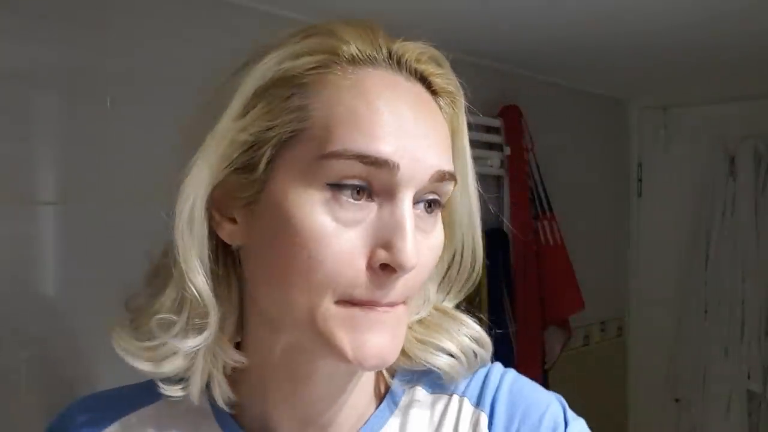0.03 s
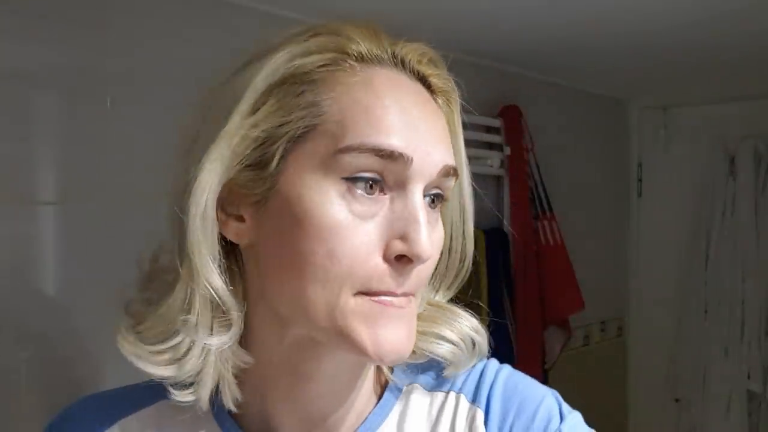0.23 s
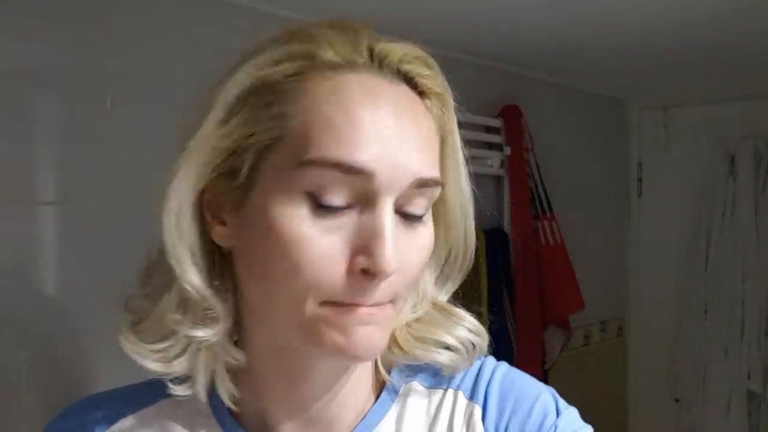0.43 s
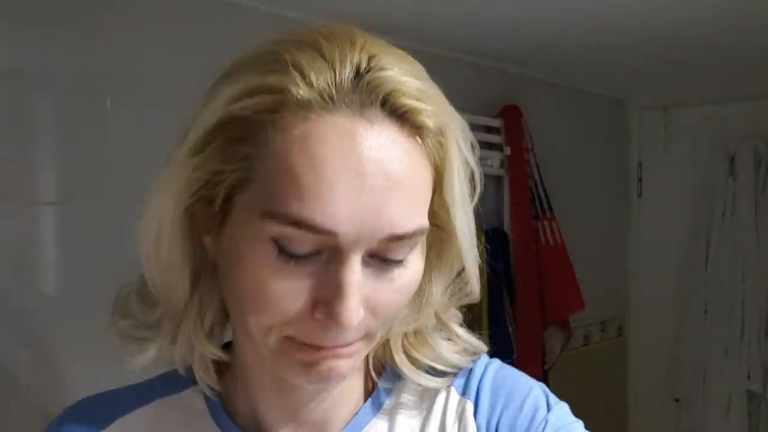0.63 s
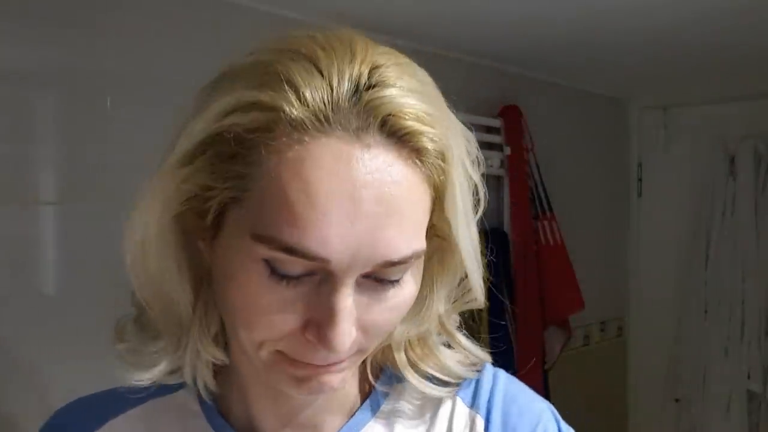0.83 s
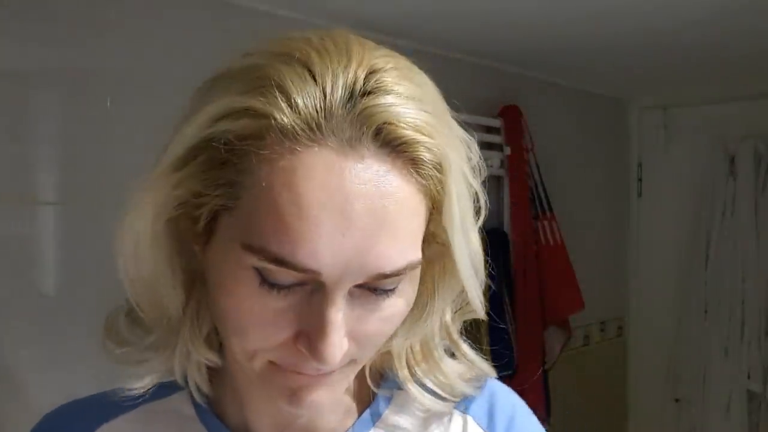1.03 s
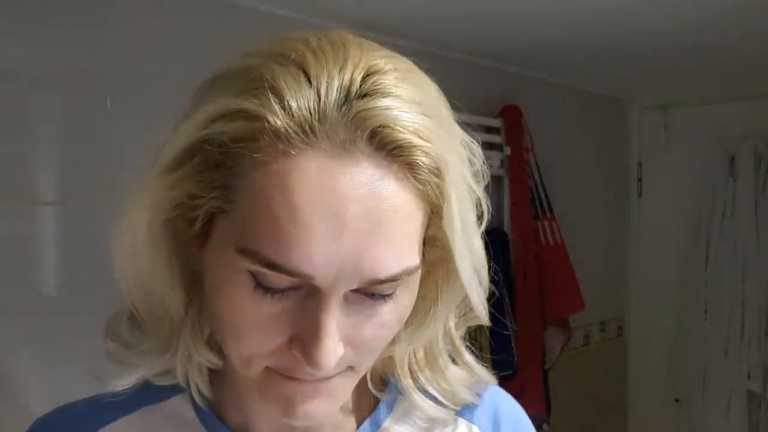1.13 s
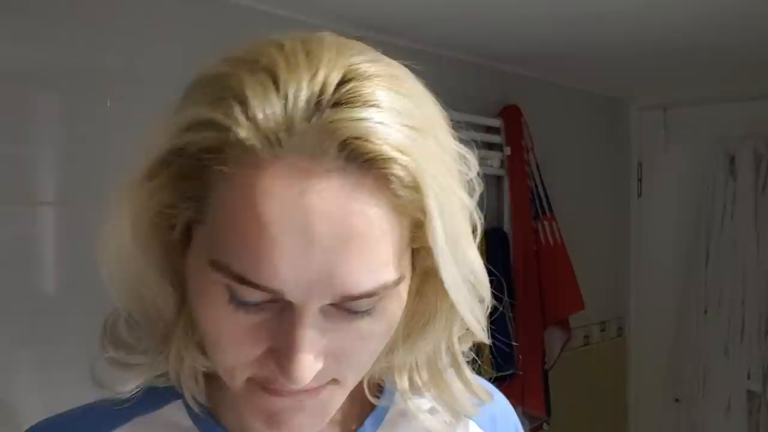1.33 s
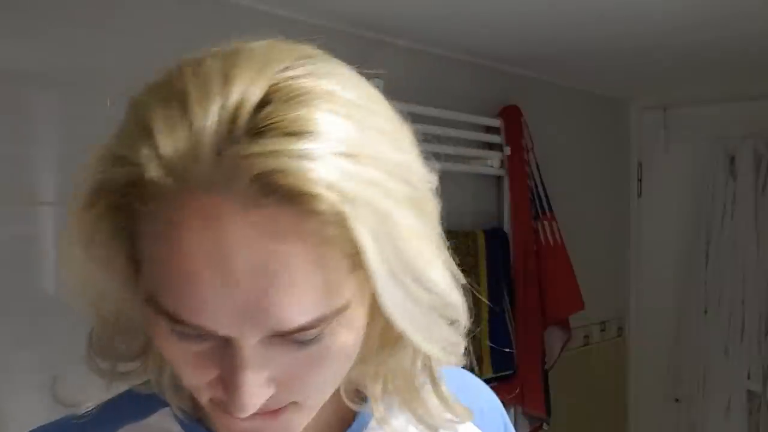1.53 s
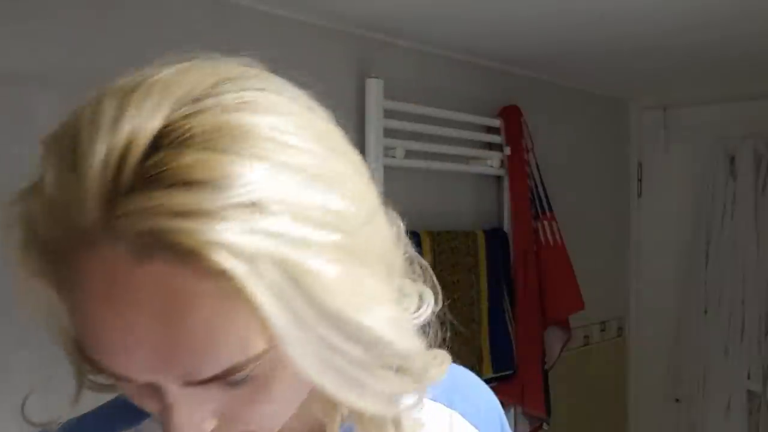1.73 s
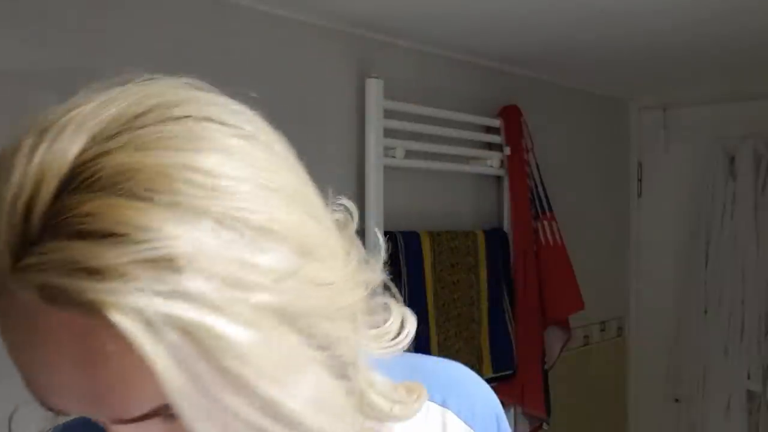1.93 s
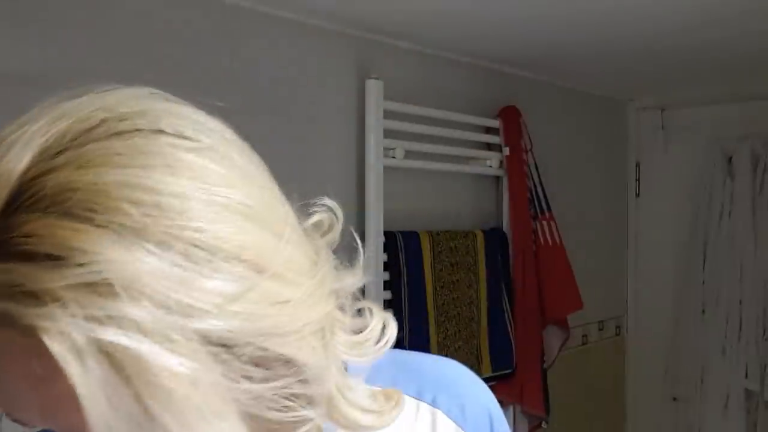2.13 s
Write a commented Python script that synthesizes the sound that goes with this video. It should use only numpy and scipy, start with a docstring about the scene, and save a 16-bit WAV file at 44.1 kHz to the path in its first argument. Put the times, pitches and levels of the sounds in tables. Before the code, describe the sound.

A small plastic cap rattles rapidly in a hollow basin, knocks again, then drops and bounces on tiles with sharp, spaced clicks and a soft thud between, in a small echoing bathroom, close stereo phone microphones.

```python
"""Plastic cap on a tiled floor

A small plastic cap rattles in a basin, falls and bounces over a tiled bathroom floor.
Every contact is a click far shorter than the answer of the hard walls: struck modes filtered by a room.
The hollow basin knocks, a soft thud falls in between; low rumble, a faint narrow band of noise near
2.8 kHz, hiss and hum lie beneath.
Two unlike phone microphones listen: the right one faces the floor, the left one is shaded."""
import sys
import numpy as np
from scipy import signal
from scipy.fft import rfft, irfft, next_fast_len
from scipy.io import wavfile
from scipy.ndimage import uniform_filter1d

SR = 44100
rng = np.random.default_rng(int(sys.argv[2]) if len(sys.argv) > 2 else 0)


def voltage_ratio(level):
    """Linear amplitude factor for a level in decibels (scalar or array-like)."""
    return 10 ** (np.asarray(level, float) / 20)


def transcribe(signal):
    """Save signal, clipped to [-1, 1], as a 16-bit WAV file at the path in sys.argv[1]."""
    frames = np.atleast_2d(signal).T
    limited = np.clip(frames, -1, 1)
    pcm = np.round(limited * 32767).astype(np.int16)
    wavfile.write(sys.argv[1], SR, pcm)


N = 95564
TAIL = 2 ** 15  # transform length in samples; each event lasts half of it

# Sharp hits of the cap, the first ones in the basin, the later ones on the floor.
# Each row: start in seconds, then rim ring, wall ring, lid ring, broad slap and bright snap in dB,
# and straight path in dB over the room.
HITS = [(0.4812, -42, -41, -62, -42.5, -45.5, 13), (0.5697, -28.5, -25, -41.5, -33.5, -39.5, 21.5),
        (0.613, -49.5, -50.5, -60, -43, -49.5, 12), (0.758, -67, -66.5, -73.5, -59, -67, -1),
        (.8600, -32.5, -23, -73.5, -35.5, -20, 17), (.893, -42.5, -28, -67.5, -45.5, -30, 4),
        (1.4288, -22, -21.5, -40, -27, -17.5, 11.5), (1.7202, -39.5, -30, -38.5, -46, -29, -2),
        (2.1017, -26.5, -22.5, -88, -36.5, -22, 4)]
# Short dense bowl-like echo after each hit. One value for each hit: level in dB over the room.
BOWL_ECHO_DB = [-11, 5.5, -11, -10, -7, -20, -12.5, -1, -15.5]
# Modes of the cap's rim, wall and lid, then of the slapped surface and the bright snap.
# Each row: centre in Hz, width in Hz, relative level in dB.
RIM_MODES = [(9300, 900, -8), (10500, 900, 0), (11800, 1200, -8)]
WALL_MODES = [(4050, 400, -6), (4750, 500, 0), (5400, 600, -7)]
LID_MODES = [(1100, 90, 0), (1720, 100, 0), (2270, 150, -6)]
SLAP_MODES = [(430, 400, -11.5), (857, 170, -5), (1420, 1100, 2), (2480, 2600, 4.5), (14300, 2500, -6.5)]
SNAP_MODES = [(7500, 6500, -0.5), (10185, 8200, -1), (13120, 3000, -3)]


def hits(hz):
    """Modal excitation: where the cap lands sets how strongly its rim, wall and lid ring."""
    out = np.zeros((2, N + TAIL))
    bodies = (RIM_MODES, WALL_MODES, LID_MODES, SLAP_MODES, SNAP_MODES)
    shade = [[voltage_ratio(LEFT_SHADE_DB)], [1]]
    for (start, *levels, direct_db), echo_db in zip(HITS, BOWL_ECHO_DB):
        click = sum(voltage_ratio(db) * ring(modes, hz) for db, modes in zip(levels, bodies))
        add(out, start, click * (room(direct_db, hz) + flurry(echo_db) * shade))
    return out


# Contacts of the cap in the basin. Each row: start in seconds, click on the glaze in dB, clack in dB,
# broad slap in dB, bowl echo in dB over the room.
RATTLE = [(0.016, -63, -63, -67.5, 5.5), (.034, -58, -43.5, -49, 8.5), (0.0395, -52, -40, -50, 15),
          (0.0613, -43.5, -53, -42, -1.5), (0.0759, -49.5, -37, -44, 12), (0.081, -45.5, -49.5, -44.5, 22),
          (0.099, -58, -52, -47, 4.5), (0.1288, -53.5, -36.5, -41.5, 21.5), (0.1521, -33.5, -27, -38, 14.5),
          (.160, -43, -34.5, -42, 23.5), (0.19, -51.5, -39, -46, 14.5), (0.2161, -42, -36.5, -45.5, 20.5),
          (0.541, -59.5, -59, -67.5, 6.5), (0.552, -59, -58, -45.5, 10)]
# Modes of the glaze, and of the cap against the bowl.
# Each row: centre in Hz, width in Hz, relative level in dB.
GLAZE_MODES = [(3200, 3100, 0.5), (6000, 1300, 1.5), (8035, 600, 2.5), (11000, 3300, -3.5)]
CLACK_MODES = [(3100, 830, -2.5), (3730, 1000, -0.5), (4300, 700, 3.5), (5670, 800, -9)]


def rattle(hz):
    """Repeated impact: each contact excites glaze, cap and slap, and the bowl echoes it."""
    out = np.zeros((2, N + TAIL))
    for start, glaze_db, clack_db, slap_db, echo_db in RATTLE:
        click = voltage_ratio(glaze_db) * ring(GLAZE_MODES, hz)
        click = click + voltage_ratio(clack_db) * ring(CLACK_MODES, hz)
        click = click + voltage_ratio(slap_db) * ring(SLAP_MODES, hz)
        add(out, start, click * (room(HIDDEN_DB, hz) + flurry(echo_db)))
    return out


def flurry(echo_db):
    """Dense early reflections: a first click, then noise decaying exponentially, as from a glazed bowl."""
    t60_s, first_click_db = 0.02, 9
    t = np.arange(TAIL // 8) / SR
    echoes = rng.standard_normal((2, len(t))) * voltage_ratio(-60 * t / t60_s)
    return voltage_ratio(echo_db) * (rfft(echoes, TAIL) + voltage_ratio(first_click_db))


# Hollow knocks of the basin. Each row: start in seconds, level of the low modes in dB,
# upper modes in dB over the low ones.
KNOCKS = [(0.044, -51, 8), (.064, -35.5, -21.5), (0.078, -33, -1.5), (.097, -33, -20), (.113, -37, -12.5),
          (0.128, -31.5, -7.5), (0.152, -33.5, 1), (0.189, -44.5, 5.5), (.216, -42.5, -3),
          (.245, -35.5, -19), (0.277, -64, -17), (.345, -69, -16), (0.464, -60.5, -22), (.488, -35.5, -8),
          (0.504, -55.5, 15), (0.572, -40, -21), (.762, -59.5, -6), (.866, -44.5, -13.5),
          (1.435, -56.5, -13.5), (1.727, -60.5, 1.5), (2.107, -61, -22)]
# Low and upper modes of the basin. Each row: centre in Hz, width in Hz, relative level in dB.
BASIN_LOW_MODES = [(231, 150, -9), (404.5, 34, 15.5), (450, 40, -4), (482, 85, -9)]
BASIN_UPPER_MODES = [(700, 65, -8), (1005, 30, 7.5), (1376, 120, -6.5), (1810, 70, -2)]


def basin(hz):
    """Resonance of a hollow body: the basin booms near the microphones, so its straight path is strong."""
    direct_db, left_lag_s = 26, 0.00033  # over the room's start; the left microphone hears it later
    out = np.zeros((2, N + TAIL))
    near = voltage_ratio(direct_db) * np.exp(-2j * np.pi * hz * np.array([[left_lag_s], [0]]))
    for start, db, upper_db in KNOCKS:
        body = ring(BASIN_LOW_MODES, hz) + voltage_ratio(upper_db) * ring(BASIN_UPPER_MODES, hz)
        add(out, start, voltage_ratio(db) * body * (room(HIDDEN_DB, hz) + near))
    return out


# Modes of the thud. Each row: centre in Hz, width in Hz, relative level in dB before softening.
THUD_MODES = [(331.3, 30, 0.5), (904, 300, -11.5), (1080, 84, -12.5), (1359, 200, -10.5), (1800, 610, -22),
              (4340, 420, -13.5)]


def thud(hz):
    """Contact stiffness: one soft, dull contact, perhaps a foot, excites little treble."""
    start_s, level_db, direct_db, top_hz = 1.106, -37.5, 23, 2200
    out = np.zeros((2, N + TAIL))
    soft = 1 / (1 + 1j * hz / top_hz) ** 4
    blow = voltage_ratio(level_db) * unit(ring(THUD_MODES, hz) * soft)
    add(out, start_s, blow * (room(HIDDEN_DB, hz) + voltage_ratio(direct_db)))
    return out


# Shaking of washstand and floor after the blows. Each row: time in seconds, level in dB.
RUMBLE_LEVEL = [(0.0, -69), (0.062, -63.5), (0.124, -54), (0.27, -52.5), (0.44, -76), (0.548, -53.5),
                (0.846, -70.5), (0.886, -57), (0.922, -71), (1.064, -84), (1.148, -54.5), (1.39, -88),
                (1.456, -72.5), (1.6, -82)]
# Spectrum of the rumble. Each row: frequency in Hz, relative density in dB per Hz.
RUMBLE_SPECTRUM = [(20, -42.5), (40, -14), (70, -12.5), (120, -2), (200, -5.5), (300, -35), (500, -72)]


def rumble():
    """Structure-borne sound: low noise follows an envelope as washstand and floor shake."""
    m = N + TAIL
    hz, t = np.fft.rfftfreq(m, 1 / SR), np.arange(m) / SR
    envelope = voltage_ratio(np.interp(t, *np.transpose(RUMBLE_LEVEL), right=-120))
    return shaped_noise(voltage_ratio(along(RUMBLE_SPECTRUM, hz)), m) * envelope


# A faint narrow band of noise near 2.8 kHz. Its single row: start in seconds, length in seconds,
# centre in Hz, width in Hz, level in dB before the envelope.
NARROW_BAND = (.775, .08, 2800, 120, -64)


def narrow_band():
    """Narrow-band noise: a Gaussian band of noise swells and fades under a rounded envelope."""
    m = N + TAIL
    hz, t = np.fft.rfftfreq(m, 1 / SR), np.arange(m) / SR
    start, length, centre_hz, width_hz, db = NARROW_BAND
    band = shaped_noise(np.exp(-((hz - centre_hz) / width_hz) ** 2), m)
    progress = np.clip((t - start) / length, 0, 1)
    return voltage_ratio(db) * band * np.sqrt(np.abs(np.sin(np.pi * progress)))


# Spectrum of room rumble and hiss. Each row: frequency in Hz, relative density in dB per Hz.
HISS_SPECTRUM = [(15, -56), (25, -32.5), (95, -6), (150, -15), (200, -6.5), (250, -0.5), (300, -6.5),
                 (420, -21), (940, -26), (6000, -31), (8000, -34.5), (11000, -21.5), (15800, -17)]
# Balance of the background. Each row: frequency in Hz, left over right in dB.
BACKGROUND_BALANCE = [(60, -13.5), (120, 9), (240, 5), (480, 5.5), (950, -5.5), (1890, -16), (3770, -2),
                      (7520, -22.5), (15000, 0.5)]
# Hum of a fan far off. Each row: frequency in Hz, rms level in dB before the balance.
HUM = [(100, -84.5), (200, -76.5)]


def background():
    """Stationary noise and pure tones: low room rumble, microphone hiss and a faint hum."""
    noise_db = -69  # rms before the balance
    m = next_fast_len(N)
    hz, t = np.fft.rfftfreq(m, 1 / SR), np.arange(m) / SR
    noise = voltage_ratio(noise_db) * shaped_noise(voltage_ratio(along(HISS_SPECTRUM, hz)), m)
    hum = sum(voltage_ratio(db) * np.sqrt(2) * np.sin(2 * np.pi * (f * t + rng.random())) for f, db in HUM)
    return sided(noise + hum, BACKGROUND_BALANCE)


def ring(modes, hz):
    """Modal superposition: band-pass modes of alternating sign make a click of energy 1."""
    scatter_db = 2  # each contact wakes each mode a little differently
    scatter = scatter_db * rng.standard_normal(len(modes))
    total = 0
    for k, (centre, width, db) in enumerate(modes):
        narrow = 1j * hz * width / (centre ** 2 - hz ** 2 + 1j * hz * width)
        broad = 1j * hz * centre / (centre ** 2 - hz ** 2 + 1j * hz * centre)
        total = total + (-1) ** k * voltage_ratio(db + scatter[k]) * narrow * broad
    return unit(total)


# Reverberation time. Each row: frequency in Hz, time to fall by 60 dB in seconds.
ROOM_T60 = [(150, 0.55), (400, 0.15), (800, 0.33), (2000, 0.34), (5500, 0.27), (10000, 0.25), (15000, 0.2)]
# Early wall reflections. Each row: delay after the straight path in seconds, left level in dB
# and right level in dB over the room's start, all before scatter.
WALL_ECHOES = [(.0052, 6, 16), (.0061, 11, 9), (.0075, 9, 7), (.0125, 5, 5)]
LEFT_LAG_S, LEFT_SHADE_DB = .001, -10  # the left microphone hears the straight path late and weak
HIDDEN_DB = -40  # straight path all but gone


def room(direct_db, hz):
    """Room impulse response: straight path, early walls and a new diffuse tail for each spot."""
    fill_s, grain_db = .002, 1.5  # the room fills; its echoes come in small clumps
    shift_s, scatter_db = .0002, 1.5  # random spread of each wall echo
    noise = rng.standard_normal((2, TAIL // 2))
    f, t, z = signal.stft(noise, SR, nperseg=128)
    decay = voltage_ratio(-60 * t / along(ROOM_T60, f)[:, None])
    tail = signal.istft(z * decay, SR, nperseg=128)[1][:, :TAIL // 2]
    tail = irfft(pair(rfft(tail, TAIL), hz), TAIL)[:, :TAIL // 2]
    t = np.arange(TAIL // 2) / SR - np.array([[LEFT_LAG_S], [0]])
    grain = voltage_ratio(grain_db * unit(uniform_filter1d(rng.standard_normal(t.shape), size=40)))
    fill = 1 - np.exp(-np.maximum(t, 0) / fill_s)
    out = rfft(tail * grain * fill, TAIL)
    for s, *db in WALL_ECHOES:
        level = voltage_ratio(db + scatter_db * rng.standard_normal(2))
        times = s + shift_s * rng.standard_normal(2)
        out = out + [level[c] * delay(times[c], hz) for c in (0, 1)]
    straight = np.array([voltage_ratio(LEFT_SHADE_DB) * delay(LEFT_LAG_S, hz), delay(0, hz)])
    return out + voltage_ratio(direct_db) * straight


def delay(s, hz):
    """Linear phase: a delay of whole samples turns phase in proportion to frequency."""
    return np.exp(-2j * np.pi * hz * round(s * SR) / SR)


# Likeness of the two microphones. Each row: frequency in Hz, left-right coherence from 0 to 1.
COHERENCE = [(100, .7), (300, .65), (600, .02), (15000, .01)]


def pair(spectra, hz):
    """Spatial coherence: two unrelated noises are mixed to the likeness of the microphones."""
    turn = np.arccos(np.clip(along(COHERENCE, hz), 0, 1)) / 2
    mid, side = spectra[0] * np.cos(turn), spectra[1] * np.sin(turn)
    return np.array([mid + side, mid - side])


def shaped_noise(gain, m):
    """Spectral shaping: white noise times a gain, coherent between microphones, at rms 1."""
    hz = np.fft.rfftfreq(m, 1 / SR)
    return unit(irfft(pair(rfft(rng.standard_normal((2, m))), hz) * gain, m))


def sided(x, balance):
    """Level difference between microphones: each takes half of the left-right balance."""
    half = along(balance, np.fft.rfftfreq(x.shape[1], 1 / SR)) / 2
    return irfft(rfft(x) * voltage_ratio([half, -half]), x.shape[1])[:, :N]


def unit(x):
    """Normalisation of power: scaled to rms 1."""
    return x / np.sqrt(np.mean(abs(x) ** 2) + 1e-30)


def along(points, hz):
    """Logarithmic frequency scale: (Hz, value) points are read on a log axis."""
    f, v = np.transpose(points)
    return np.interp(np.log(hz + 1), np.log(f + 1), v)


def add(out, s, spectrum):
    """Linear superposition: a sound is added in at its time."""
    i = round(s * SR)
    out[:, i:i + TAIL // 2] += irfft(spectrum, TAIL)[:, :TAIL // 2]


# Balance of all sources but the background. Each row: frequency in Hz, left over right in dB.
SOURCE_BALANCE = [(40, -4.5), (120, 2.5), (250, 7), (450, 7.5), (740, -11), (1220, 5), (2010, -5.5),
                  (3330, -3.5), (5500, -1), (9080, -10.5), (12000, -6.5), (15000, -9)]


def scene():
    """Superposition: all sources as the two microphones hear them."""
    hz = np.fft.rfftfreq(TAIL, 1 / SR)
    sources = hits(hz) + rattle(hz) + basin(hz) + thud(hz) + rumble() + narrow_band()
    return sided(sources, SOURCE_BALANCE) + background()


def band_limit(x):
    """A steep low-pass at the top of the band."""
    return signal.sosfilt(signal.butter(12, 16600, fs=SR, output="sos"), x)


def record(dry):
    """Band limiting: a smooth low-pass removes the top treble of the finished mix."""
    top_hz, edge_hz = 15950, 120
    hz = np.fft.rfftfreq(N, 1 / SR)
    low_pass = (1 - np.tanh((hz - top_hz) / edge_hz)) / 2
    mix = irfft(rfft(dry) * low_pass, N)
    return band_limit(mix)


dry = scene()
out = record(dry)
transcribe(out)
```